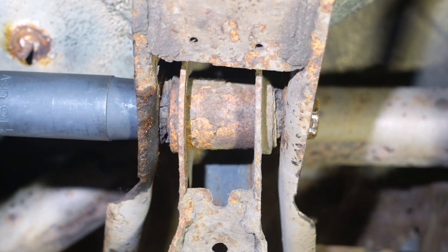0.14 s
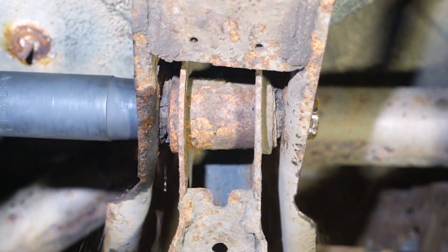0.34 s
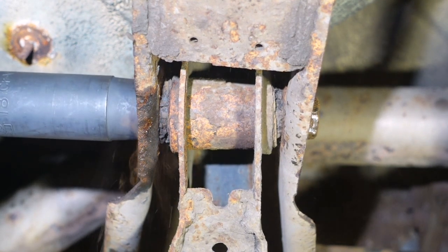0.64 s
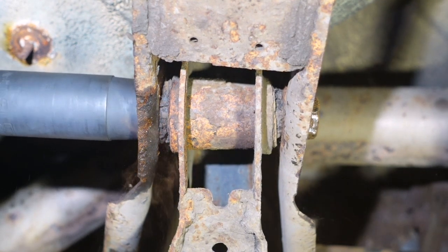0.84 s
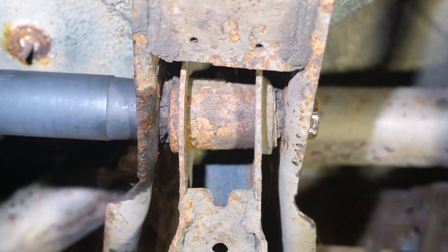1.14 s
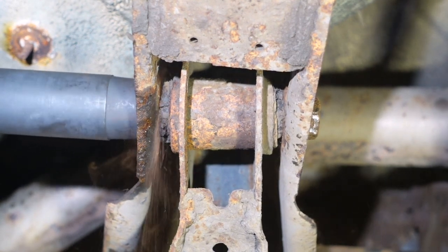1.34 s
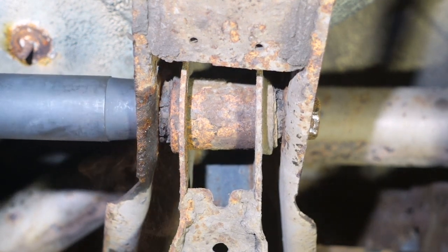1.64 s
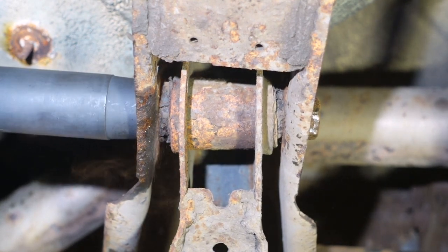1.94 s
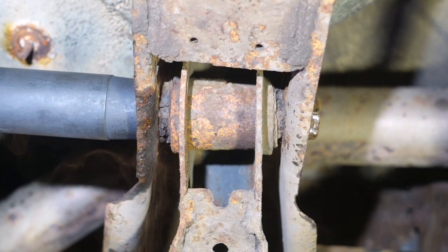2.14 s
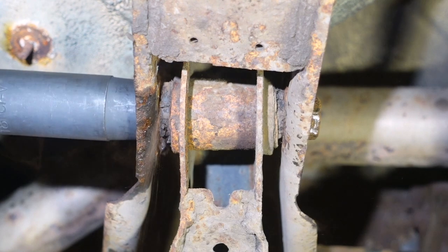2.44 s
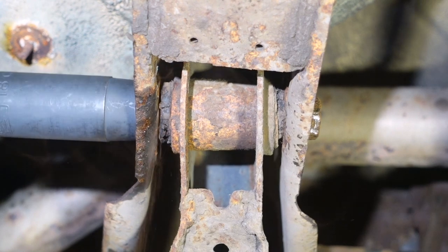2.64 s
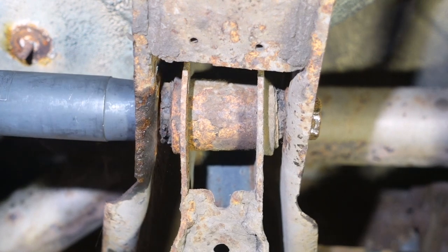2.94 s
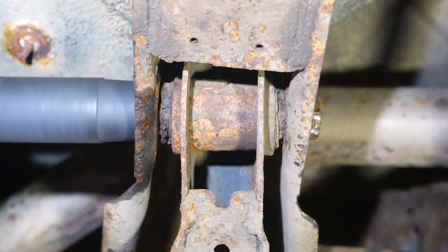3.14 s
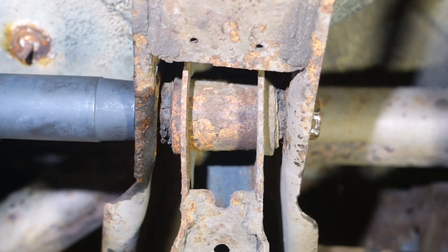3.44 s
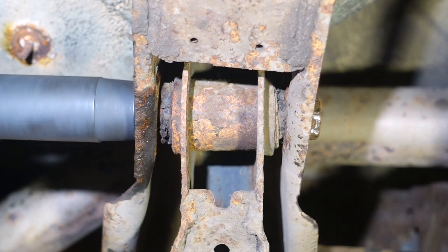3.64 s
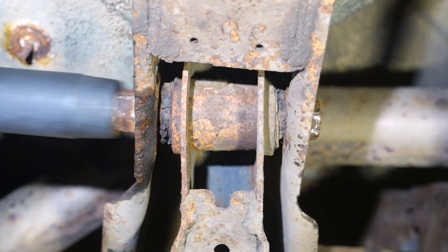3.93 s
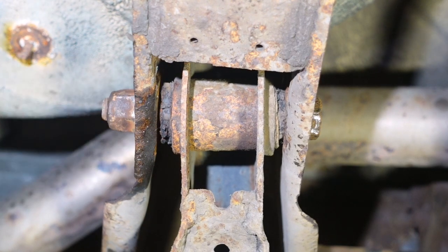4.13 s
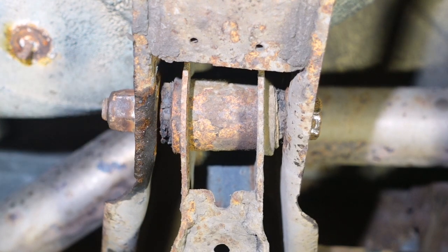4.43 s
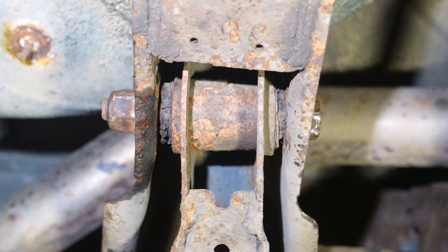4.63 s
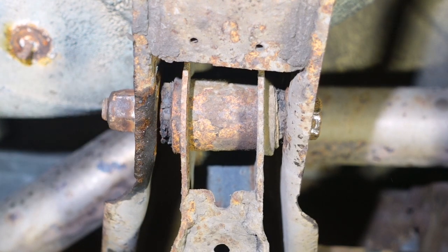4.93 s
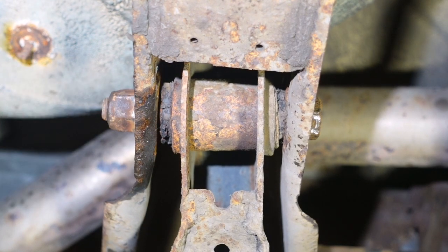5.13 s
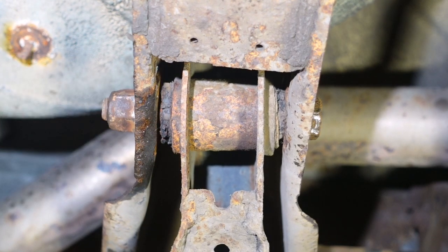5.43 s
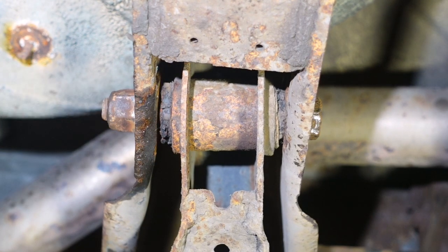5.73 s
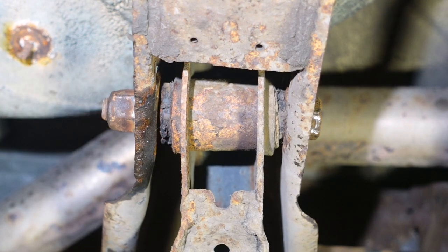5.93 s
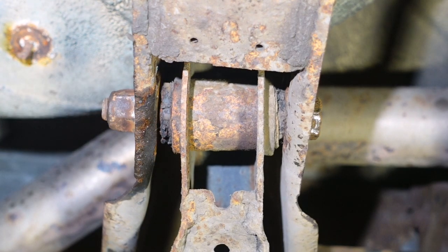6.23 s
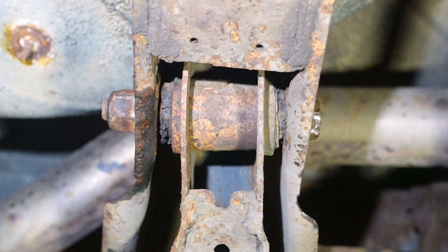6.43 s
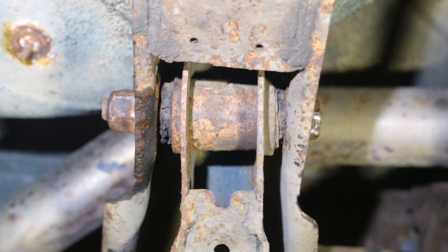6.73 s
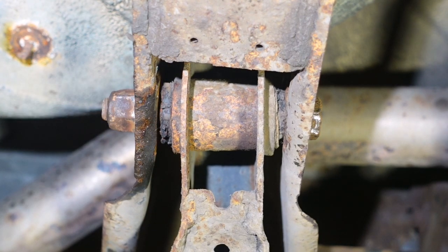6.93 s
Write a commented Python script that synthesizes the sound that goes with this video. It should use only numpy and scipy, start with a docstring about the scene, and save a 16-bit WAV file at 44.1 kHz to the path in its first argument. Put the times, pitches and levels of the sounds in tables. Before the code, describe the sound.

Close up in a garage, an impact wrench hammers on a seized bolt in two longer bursts, then a few short blips. Rapid, sharp blows ring the socket and knock the steel bracket over a whirring motor. The socket slides off the nut, the background comes up slightly, and tools land with knocks and clinks while small wheels rumble over the floor.

```python
"""Close up in a garage, an impact wrench hammers a seized suspension bolt: two long bursts, then short blips.
Each blow cracks on the anvil, rings the socket and knocks the bracket over the whirr of the motor.
A limiter flattens the blows and lets the room swell between them; then the socket slides off the nut.
From there the level is turned up: tools land with knocks and clinks, and small wheels rumble over the floor."""
import sys
import numpy as np
from scipy import signal
from scipy.io import wavfile
from scipy.ndimage import uniform_filter1d

SR = 44100
rng = np.random.default_rng(int(sys.argv[2]) if len(sys.argv) > 2 else 0)


def int16_out(signal):
    """Quantize to a 16-bit WAV file."""
    q = np.round(np.clip(np.atleast_2d(signal).T, -1, 1) * 32767)
    wavfile.write(sys.argv[1], SR, q.astype(np.int16))


N = 311787
T = np.arange(N) / SR
TURN_UP_S = 4.05  # room tone and limiter ceiling step up here

# Tone curves. Each row: frequency in Hz, relative level in dB.
ROOM_TONE_EQ = [(20, 1), (80, 1), (170, -4), (350, 1), (480, -2), (620, -1), (1000, -7), (1450, -6.5),
                (2100, -11), (3000, -12.5), (3800, -16), (7000, -19), (15500, -28)]
WALL_EQ = [(30, -7.5), (150, -2), (260, -0.5), (390, 10), (600, -6), (16000, 0)]
SURFACE_EQ = [(20,-71), (60,-49), (180,-19.5), (380,-9.5), (650,4), (880,-8), (1060,-6.5), (1250,-10),
              (1500,-3.5), (2000,-12), (3500,-18), (7000,-38), (15000,-40)]
JOLT_EQ = [(60, -55), (300, -30), (700, -15), (900, -3), (1020, 0), (1180, -3), (1500, -15), (3000, -32),
           (8000, -60), (16000, -75)]
CLINK_EQ = [(60, -45), (170, -41), (300, -3.5), (1000, -2), (2000, 1.5), (4500, -1), (6500, -10),
            (10000, -16.5), (16000, -28.5)]
MOTOR_EQ = [(20, -46), (60, -16.5), (150, -13.5), (400, -3.5), (900, 3), (1500, 2), (3000, -10),
            (5000, -17), (7000, -24.5), (16000, -38.5)]
HISS_EQ = [(200, -50), (1500, -24.5), (2600, -11.5), (3400, -2.5), (4200, -3), (5200, -5.5), (6400, -11.5),
           (10000, -16.5), (16000, -31)]
BRACKET_EQ = [(25,-36), (60,-33), (130,-14.5), (300,-14), (450,-6), (700,4.5), (1050,7), (1400,-1),
              (2200,-4.5), (5000,-27.5), (16000,-68.5)]
SOCKET_EQ = [(300, -46), (1300, -13), (2000, 1), (3000, -1), (4200, -2), (5300, -3), (6300, -13.5),
             (10000, -16.5), (16000, -30.5)]
ANVIL_EQ = [(200, -49), (1500, -23.5), (5000, 2), (7000, 1), (11000, -2), (13000, -6.5), (16000, -15.5)]
RUMBLE_EQ = [(20, -19.5), (50, -9.5), (110, 1), (220, 0.5), (400, -2.5), (1000, -25.5), (4000, -65.5)]
THUMP_EQ = [(40, -32), (200, 4.5), (450, 3.5), (1000, -11), (4000, -17.5), (15000, -38)]
SNAP_EQ = [(100, -55), (500, 14), (4000, -4), (10000, -5), (16000, 1)]
# The garage's tail. Each row: frequency in Hz, t60 in seconds.
ROOM_DECAY = [(100, 1), (250, 0.41), (550, 0.43), (1400, 0.45), (3700, 0.53), (7000, 0.44), (10000, 0.4),
              (16000, 0.34)]

# Cue levels are set ahead of each layer's fader.
# Swells. Each row: start in seconds, end in seconds, level in dB.
LOW_SWELLS = [(.19, .56, -41), (.93, 1.01, -34.5), (4.4, 4.47, -72), (4.95, 5.9, -72.5), (5.12, 5.35, -63),
              (6.76, 7.07, -65)]
SCRAPES_AND_ROLLS = [(3.66, 3.77, -54.5), (3.91, 4.0, -63), (4.84, 5.05, -56), (5.33, 5.43, -33),
                     (5.56, 6.54, -55), (6.18, 6.25, -47), (6.665, 6.94, -34.5), (7.0, 7.07, -29)]  # the socket slides off the nut, later small wheels roll
SOCKET_SPINS = [(1.25, 1.45, -64), (2.78, 2.89, -35), (3.03, 3.14, -43)]
FULL_SPEED_HISSES = [(.36, .59, -22.5), (.92, 1.12, -23)]
# Dry ticks. Each row: start in seconds, thump and snap levels in dB, the snap's top edge in Hz.
TICK_CUES = [(4.329,-44,-69,14000), (4.3774,-36.5,-54,15000), (4.4225,-42.5,-67,14000),
             (4.459,-46.5,-70,12000), (4.608,-57,-28.5,10800), (6.2835,-67,-40,17000)]
# Loose steel. Each row: start in seconds, then modes, each with pitch in Hz, level in dB, t60 in seconds.
CHIME_CUES = [(5.0455, [(657,-20.5,0.25), (958,-24,0.27), (1217,-21,.16)]), (5.934, [(3320,-40.5,0.043)]),
              (6.281, [(2880,-41,0.3), (3120,-42,0.23), (4500,-53,.16), (6400,-51,0.12)]),
              (6.5584, [(993,-21,0.069), (1180,-34,0.16), (2980,-41.5,0.42)]), (6.9436, [(3870,-49,.17),
              (4750,-33,0.18), (5250,-36,0.23), (5600,-50,0.18), (9300,-31,0.047)])]
# Knocks: the first four are the wrench's hammer clacking as it takes up slack, the rest are tools landing. Each
# row: start in seconds, level in dB, body pitch in Hz, clink against body in dB, # the body's clatter t60 in
# seconds, room send in dB.
KNOCK_CUES = [(0.039,-53.5,970,-26,0.046,8), (.13,-31,905,-20,0.04,-19), (2.13,-30,1040,-26.5,0.032,-5),
              (2.2124,-26.5,886,-9,0.065,-7.5), (3.595,-51,940,-22,0.033,-9.5),
              (3.714,-45,750,-0.5,.054,-3), (3.756,-40.5,696,-1,0.037,-16.5), (3.985,-48,1090,-12,0.06,-17),
              (4.053,-45.5,960,-8,0.071,1.5), (4.6072,-27.5,1180,0.5,.04,-10.5),
              (5.0455,-5.5,820,-13,0.063,-8.5), (5.344,-12.5,530,-39,0.039,-11.5),
              (5.349,-13.5,700,-8,0.095,-6.5), (5.504,-25,855,-4.5,0.048,-1.5),
              (5.740,-39,633,-10,0.057,-3.5), (5.813,-40,830,-6,.047,-0.5), (5.937,-35,720,-8.5,0.033,-3.5),
              (6.077,-49,597,1.5,0.026,-2.5), (6.282,-35,1010,5.5,0.025,-7), (6.5579,-23,984,-7.5,0.022,-3),
              (6.9058,-20.5,830,-23,0.013,-2.5), (6.9302,-32.5,970,-23,.017,10),
              (6.9436,-17,626,-1,0.014,-16), (7.05,-28,900,-29,0.045,-12)]
# Ring of bracket, bolt and socket. Each row: pitch in Hz, level in dB, t60 in seconds.
STEEL_MODES = [(397.6,5,0.3), (476,-3,0.05), (640,2,.08), (855,1,0.063), (1059,-0.5,.06), (1220,-12,0.078),
               (1398,3.5,0.067), (1710,4.5,0.052), (1910,-8.5,0.035), (2230,-15.5,.05), (2560,-8.5,.09),
               (2930,-8,0.12), (3393,-3,.06), (3592,-11.5,0.074), (3716,-10.5,.07), (3860,-4,.08),
               (4200,0.5,0.052)]
# Trigger pulls. Each row: press and release in seconds, motor whirr and frame buffeting in dB.
TRIGGER_PULLS = [(0.088, 0.624, -24, -52), (.75, 1.283, -26, -46.5), (1.789, 2.079, -36.5, -54),
                 (2.21, 2.572, -25, -53), (2.7, 2.887, -25, -58), (3.0, 3.111, -31.5, -64.5)]
# Lone blows as the motor starts or stops. Each row: start in seconds, crack, knock and ring in dB.
LONE_BLOWS = [(.756, -37.5, -35, -28), (.776, -39, -24, -23.5), (1.313, -40.5, -25.5, -31.5),
              (1.3734, -45.5, -32.5, -40.5), (1.393, -56, -41.5, -61), (1.54, -66.5, -53.5, -52),
              (1.838, -64, -48.5, -45.5), (1.879, -73, -48.5, -51), (2.02, -44.5, -28.5, -36),
              (2.2225, -44, -32.5, -35), (2.59, -35.5, -22.5, -28.5), (2.7183, -38.5, -26.5, -43),
              (2.741, -49, -36, -35.5), (3.0156, -41.5, -25, -31), (3.068, -47, -30, -32),
              (3.183, -63, -55, -50.5)]
# Hammer runs. Each row: start in seconds, blow count, then first gap, full-speed gap and the
# lengthening of the last gap in seconds.
HAMMER_RUNS = [(.1578, 23, .0418, .017, .0067), (.8268, 23, .0365, .0171, .0067), (1.9035, 3, .04, .017, 0),
               (2.2885, 9, .0414, .0289, 0), (2.7968, 3, .0422, .0212, 0)]
# Weight of each run. Each row: anvil crack, bracket knock and socket ring in dB.
RUN_LEVELS = [(-36.5, -34.5, -29), (-35.5, -34, -30.5), (-37.5, -29.5, -29.5), (-36, -27, -28),
              (-37.5, -28, -28.5)]


def amp(db):
    return 10 ** (np.asarray(db) / 20)


def unit_rms(x):
    return x / np.sqrt(np.mean(x ** 2) + 1e-20)


def curve_at(curve, hz):
    freqs, values = np.transpose(curve)
    return np.interp(np.log(hz + 1), np.log(freqs + 1), values)


def add(mix, start, sound):
    part = mix[max(round(start * SR), 0):][:len(sound)]
    part += sound[:len(part)]


def colour(x, eq, size=4096):
    """Shape a sound with a tone curve, through a causal filter of unit energy."""
    log_gain = np.log(amp(curve_at(eq, abs(np.fft.fftfreq(size, 1 / SR)))))
    taps = np.fft.ifft(np.exp(np.conj(signal.hilbert(log_gain)))).real[:size // 2]
    return signal.oaconvolve(x, taps / np.linalg.norm(taps))[:len(x)]


def noise(eq):
    return colour(rng.standard_normal(N), eq)


def swells(rows, rise_s, fall_s):
    """A fader ride for rows of start, end and dB: soft rise, hold, exponential fall."""
    t = T[::32]
    gain = 0
    for start, end, db in rows:
        rise = (1 - np.exp(-np.maximum(t - start, 0) / rise_s)) ** 2
        gain += amp(db) * rise * np.exp(-np.maximum(t - end, 0) / fall_s)
    return np.interp(T, t, gain)


def contact(t60, push=0., size=8192):
    """One hit: an optional clean push, then dense chatter that dies away."""
    chatter = rng.standard_normal(size) * amp(-60 * np.arange(size) / SR / t60)
    chatter /= np.linalg.norm(chatter)
    chatter[0] += push
    return chatter / np.hypot(1, push)


def garage(x, predelay_s=0.007, build_s=0.00097, crossfade_hz=5, count=3):
    """Dense reflections, each band dying at its own speed; crossfaded tails avoid fixed ringing."""
    hz, t, bands = signal.stft(rng.standard_normal((count, SR)), SR, nperseg=256)
    decay_db = curve_at(WALL_EQ, hz)[:, None] - 60 * t / curve_at(ROOM_DECAY, hz)[:, None]
    tails = signal.istft(bands * amp(decay_db), SR, nperseg=256)[1]
    tails *= 1 - np.exp(-np.maximum(np.arange(tails.shape[1]) / SR - predelay_s, 0) / build_s)
    tails /= np.linalg.norm(tails[0])
    sends = np.sqrt(2 / count) * np.cos(np.pi * (crossfade_hz * T + np.arange(count)[:, None] / count))
    return signal.fftconvolve(x * sends, tails, axes=1).sum(0)[:N]


def air():
    """A quiet bed of room tone and rumble, with low buffeting from gusts and the shaking frame, and later low
    rumble from handling and rolling wheels."""
    turned_up = T >= TURN_UP_S
    room_tone = amp(np.where(turned_up, -68, -87)) * noise(ROOM_TONE_EQ)
    bed = amp(np.where(turned_up, -71, -88))
    shaking = swells([(on, off, db) for on, off, _, db in TRIGGER_PULLS], rise_s=0.082, fall_s=0.11)
    low_swells = swells(LOW_SWELLS, rise_s=0.043, fall_s=0.037)
    return room_tone + (bed + shaking + low_swells) * noise(RUMBLE_EQ)


def scrapes_and_rolls(bumps_per_s=160, spread_db=1.0, grit=0.18, jolts_per_s=55):
    """The sliding socket and small wheels catch on rough surfaces: bumps over grit, and hollow jolts."""
    bumps = (rng.random(N) < bumps_per_s / SR) * amp(spread_db * rng.standard_normal(N).clip(-2, 2))
    pace = np.repeat(rng.exponential(size=N // 512 + 1), 512)[:N]
    jolts = np.diff(np.floor(np.cumsum(pace) * jolts_per_s / SR), prepend=0)
    texture = unit_rms(bumps) + grit * rng.standard_normal(N)
    surface = amp(-1) * colour(texture, SURFACE_EQ) + amp(1.5) * colour(unit_rms(jolts), JOLT_EQ)
    moving = swells(SCRAPES_AND_ROLLS, rise_s=0.0081, fall_s=0.0083) * surface
    return amp(-12) * moving + garage(amp(-9.5) * moving)


def ticks():
    """Dry ticks right at the mic: a dull thump under a bright snap."""
    thumps, snaps = np.zeros((2, N))
    for start, thump_db, snap_db, edge_hz in TICK_CUES:
        add(thumps, start, amp(thump_db) * contact(t60=0.013, push=3.9))
        high_cut = signal.butter(6, edge_hz, fs=SR, output="sos")
        add(snaps, start, amp(snap_db) * signal.sosfilt(high_cut, contact(t60=0.009, push=0.6)))
    return amp(13.5) * colour(thumps, THUMP_EQ) + amp(17.5) * colour(snaps, SNAP_EQ)


def chimes(flutter_depth=0.0395):
    """Loose steel rings on after a knock; rattling against its support makes the pitch flutter."""
    t, notes = np.arange(SR // 2) / SR, np.zeros(N)
    for start, modes in CHIME_CUES:
        for hz, db, t60 in modes:
            flutter = unit_rms(uniform_filter1d(rng.standard_normal(len(t)), size=80))
            cycles = np.cumsum(hz * (1 + flutter_depth * flutter)) / SR
            add(notes, start, amp(db - 60 * t / t60) * np.sin(2 * np.pi * cycles))
    low_cut = signal.butter(2, 400, "high", fs=SR, output="sos")  # the ringing stays clear of bass
    notes = signal.sosfilt(low_cut, notes)
    return amp(-5) * notes + garage(amp(-13) * notes)


def body_eq(hz):
    """Tone curve of a struck body with one broad resonance."""
    return [(hz / 12, -60), (hz / 3, -25), (hz / 1.54, -5), (hz, 0),
            (hz * 1.22, -4), (hz * 3, -14), (hz * 6, -32), (hz * 16, -52)]


def knocks():
    """Knocks on metal and floor: a broad body and a bright clink, thrown back by the room. The first few are
    the wrench's hammer clacking as it takes up slack; the rest are tools landing."""
    close, send = np.zeros((2, N))
    click = signal.unit_impulse(8192)
    for start, db, hz, clink_db, t60, room_db in KNOCK_CUES:
        body = colour(contact(t60, push=0.8), body_eq(hz))
        clink = colour(contact(t60 * 2.1, push=0.77), CLINK_EQ)
        add(close, start, amp(db + 13) * (body + amp(clink_db) * clink))
        clean_hit = colour(click, body_eq(hz)) + amp(clink_db) * colour(click, CLINK_EQ)
        add(send, start, amp(db + room_db + 17.5) * clean_hit)
    return close + garage(send)


def socket_hum(hz=378, width_hz=71):
    """The free-spinning socket hums in the hollow frame, rough with wandering strength and phase."""
    pole = np.exp(-np.pi * width_hz / SR)
    wander = rng.standard_normal(N) + 1j * rng.standard_normal(N)
    for _ in range(2):
        wander = signal.lfilter([1], [1, -pole], wander)
    hum = unit_rms((wander * np.exp(2j * np.pi * hz * T)).real)
    return swells(SOCKET_SPINS, rise_s=0.055, fall_s=0.051) * hum


def steel_ring(x):
    """Struck bracket, bolt and socket keep ringing at their modes, on top of the dry sound."""
    t = np.arange(SR // 2) / SR
    ring = 0
    for hz, db, t60 in STEEL_MODES:
        fade = amp(-60 * t / t60)
        ring += amp(db) * 2 * fade / fade.sum() * np.cos(2 * np.pi * hz * t)
    return x + amp(-4) * signal.fftconvolve(x, ring)[:N]


def hammering(start, blows, first_gap, full_gap, sag, crack_db, knock_db, ring_db, scatter_db=1.5):
    """One run, in rows like LONE_BLOWS: blows quicken with the motor, then slow as the trigger eases."""
    blow = np.arange(blows)
    gaps = full_gap + (first_gap - full_gap) * 0.657 ** blow
    easing_s = sag * 0.64 ** blow[::-1]
    times = start + np.cumsum(gaps) - gaps + np.cumsum(easing_s)
    softening_db = -1100 * easing_s  # the more a blow drags, the weaker its crack
    crack, knock, ring = scatter_db * rng.standard_normal((blows, 3)).T
    return np.column_stack([times, crack + crack_db + softening_db, knock + knock_db, ring + ring_db])


def wrench():
    """Each blow cracks the anvil, rings the socket and knocks the bracket, over motor whirr and hiss."""
    runs = [hammering(*run, *levels) for run, levels in zip(HAMMER_RUNS, RUN_LEVELS)]
    crack, socket, bracket = np.zeros((3, N))
    for start, crack_db, knock_db, ring_db in np.vstack([LONE_BLOWS] + runs):
        add(crack, start, amp(crack_db) * contact(t60=0.03))
        add(socket, start, amp(ring_db) * contact(t60=0.12))
        add(bracket, start, amp(knock_db) * contact(t60=0.064))
    anvil = amp(37.5) * colour(crack, ANVIL_EQ)
    metal = amp(31.5) * colour(socket, SOCKET_EQ) + amp(34.5) * colour(bracket, BRACKET_EQ)
    throttle = swells([(on, off, db) for on, off, db, _ in TRIGGER_PULLS], rise_s=0.082, fall_s=0.024)
    motor = amp(-4) * throttle * noise(MOTOR_EQ)
    body = steel_ring(metal + motor)
    hiss = swells(FULL_SPEED_HISSES, rise_s=0.036, fall_s=0.047) * noise(HISS_EQ)
    return hiss + anvil + body + garage(amp(-11) * anvil + amp(-5.5) * body)


def scene():
    return (wrench() + socket_hum() + knocks() + chimes() + ticks() + scrapes_and_rolls() + air())[None]


def record(dry, threshold_db=-27.5, release_db_per_s=85, high_cut_hz=15950):
    """Gain control, fast limiter, soft clip and high cut; the ceiling lifts when the level is turned up."""
    x = dry[0]
    lift_db = np.where(T < TURN_UP_S, 0, 17)
    power_db = 10 * np.log10(abs(uniform_filter1d(x ** 2, size=400)) + 1e-14)
    over_db = np.maximum(power_db - threshold_db - lift_db, 0)
    release_db = T * release_db_per_s
    duck_db = np.maximum.accumulate(over_db + release_db) - release_db
    ducked = x / amp(uniform_filter1d(duck_db, size=100))
    # the limiter shaves the front of every blow and lets go at once
    excess = abs(uniform_filter1d(ducked ** 2, size=150)) / amp(lift_db - 29.3) ** 2
    limited = ducked / np.sqrt(uniform_filter1d(np.maximum(excess, 1), size=60))
    ceiling = amp(lift_db - 22.8)
    clipped = limited / (1 + (limited / ceiling) ** 8) ** (1 / 8)
    high_cut = signal.firwin(511, high_cut_hz, window=("kaiser", 9), fs=SR)
    return signal.oaconvolve(clipped, high_cut, "same")[None]


dry = scene()
out = record(dry)
int16_out(out)
```